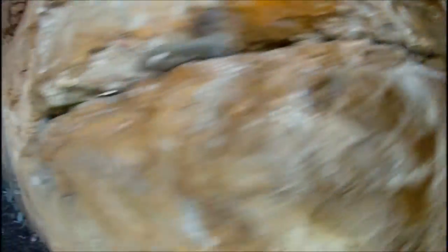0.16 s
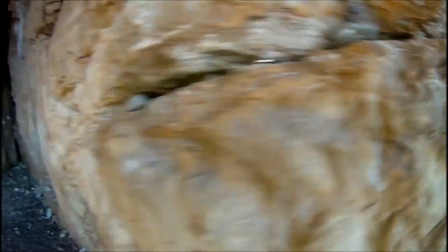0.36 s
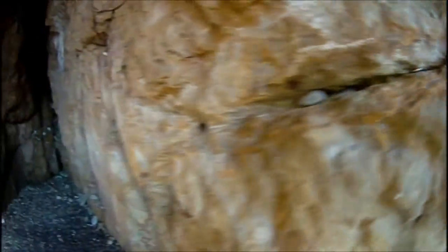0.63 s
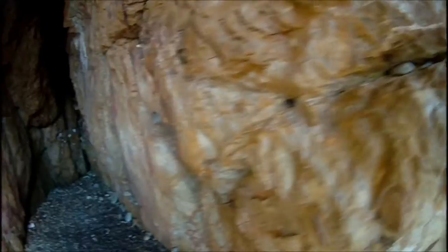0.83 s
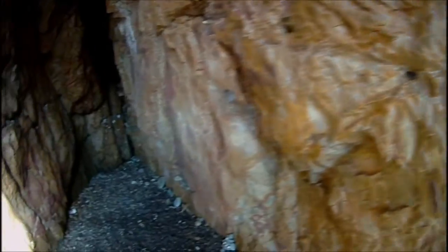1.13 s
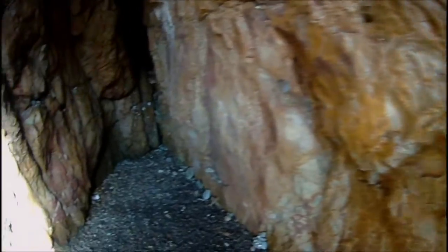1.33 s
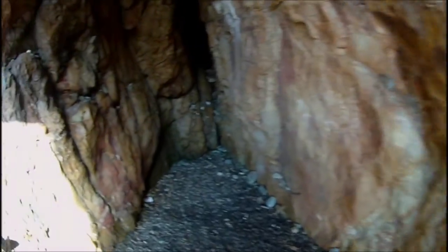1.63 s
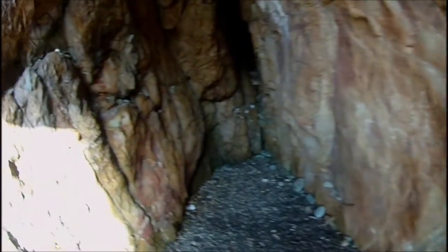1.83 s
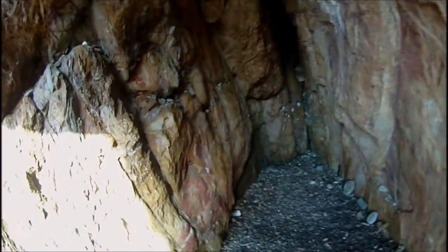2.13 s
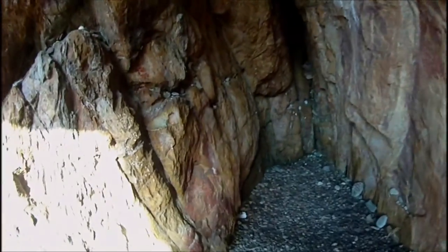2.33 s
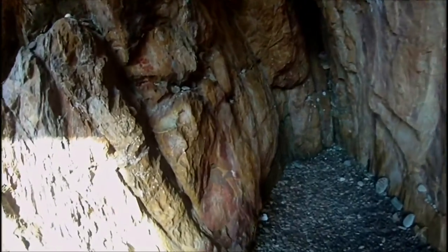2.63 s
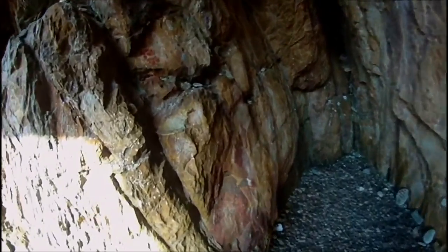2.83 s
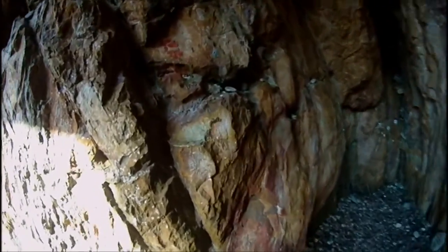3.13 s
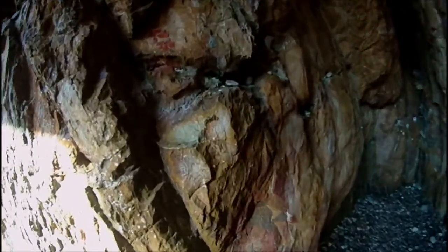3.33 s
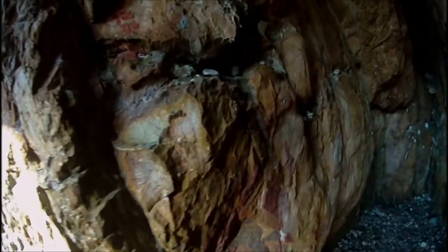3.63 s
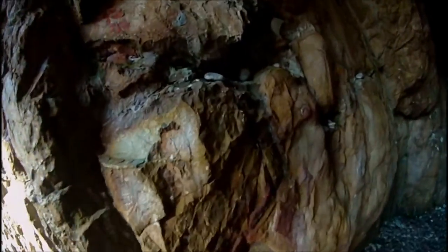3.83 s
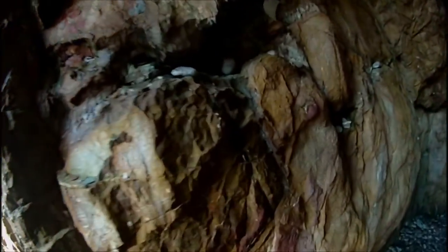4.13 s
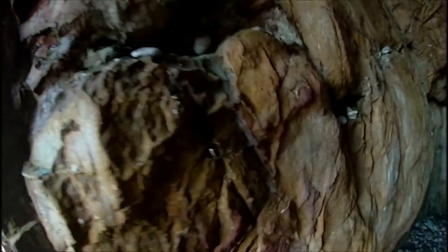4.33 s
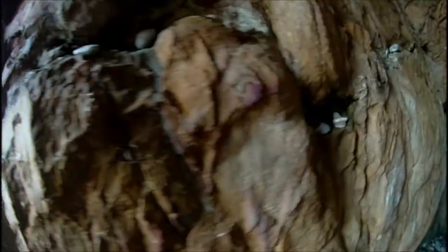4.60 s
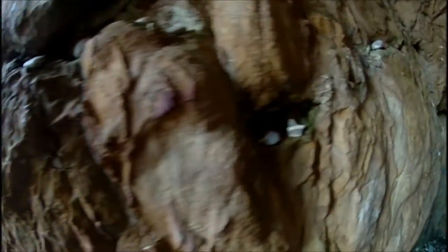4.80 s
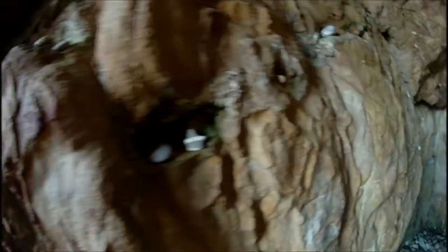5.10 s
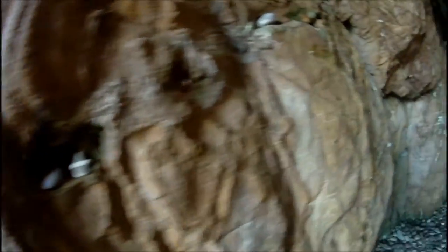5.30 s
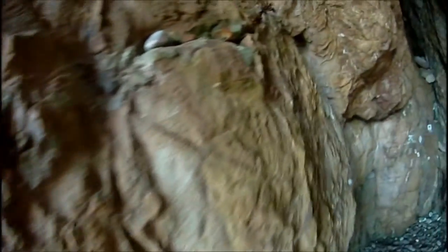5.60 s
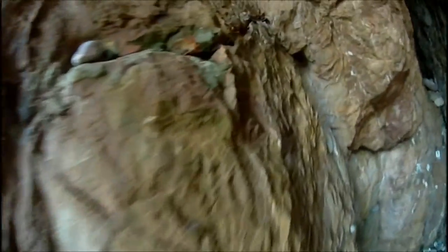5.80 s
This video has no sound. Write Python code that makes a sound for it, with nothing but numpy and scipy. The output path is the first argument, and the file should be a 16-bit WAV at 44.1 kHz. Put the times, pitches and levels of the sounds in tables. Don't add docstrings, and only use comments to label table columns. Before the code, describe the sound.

Someone walks unhurriedly on loose shingle inside a narrow sea cave, grit crushing and single stones knocking over distant wave wash.

```python
import sys
import numpy as np
from scipy import signal
from scipy.fft import rfft, irfft, next_fast_len
from scipy.io import wavfile
from scipy.ndimage import uniform_filter1d, map_coordinates

SR = 44100
rng = np.random.default_rng(int(sys.argv[2]) if len(sys.argv) > 2 else 0)


def decibels_to_gain(level_db):
    exponent = np.asarray(level_db, float) / 20
    return 10 ** exponent


def materialize(psi):
    bounded = np.clip(np.atleast_2d(psi).T, -1, 1)
    quanta = np.round(bounded * 32767).astype(np.int16)
    wavfile.write(sys.argv[1], SR, quanta)


N = 262561


def unit(x):
    return x / np.sqrt(np.mean(x ** 2) + 1e-20)


def along(points, hz):
    f, v = np.transpose(points)
    return np.interp(np.log(hz + 1), np.log(f + 1), v)


def wobble(rate):
    knots = rng.standard_normal(int(N * 40 / SR))
    return map_coordinates(knots, [np.arange(N) * min(rate, 39) / SR])


def filtered(x, response):
    m = next_fast_len(N + 8192, real=True)
    return irfft(rfft(x, m) * response(np.fft.rfftfreq(m, 1 / SR)), m)[..., :N]


def causal(points):
    def response(hz):
        c = irfft(np.log(decibels_to_gain(along(points, hz))))
        c[1:len(c) // 2] *= 2
        c[len(c) // 2 + 1:] = 0
        return np.exp(rfft(c))
    return response


def noise(spectrum, patchy_db, channels=1):
    z = signal.stft(rng.standard_normal((channels, N)), nperseg=512)[2]
    field = rng.standard_normal(z.shape[1:])
    field = uniform_filter1d(field, size=6, axis=0)
    field = uniform_filter1d(field, size=10, axis=1)
    x = signal.istft(z * decibels_to_gain(patchy_db * unit(field)), nperseg=512)[1][:, :N]
    return unit(filtered(x, lambda hz: decibels_to_gain(along(spectrum, hz))))


def swells(s, db, rise, fall, since=0):
    t = np.arange(0, N + 64, 64)[:, None] / SR
    below = np.maximum((s - t) / np.abs(rise), (t - s) / np.abs(fall))
    each = (t >= since) * decibels_to_gain(db - 20 * below)
    total = np.sqrt(np.sum(each ** 2, axis=1)) + 1e-9
    return np.interp(np.arange(N) / SR, t[:, 0], total)


def rings(start, gain, hz, cycles, size):
    k = np.arange(size)
    turn = k * hz[:, None] / SR
    wave = gain[:, None] * np.sin(2 * np.pi * turn) * np.exp(-turn / cycles) * np.tanh(1.75 * turn)
    return np.bincount((start[:, None] + k).ravel(), wave.ravel(), N + size)[:N]


# peak_s, grit_db, fall_20db_s, pebble_share_db, sand_share_db
HEEL_LANDINGS = [(0.642, -47, 0.3, -10, -14.5), (.793, -54, 0.5, -12, -27), (1.335, -45, 0.1, -14, -11),
                 (1.462, -60, 0.3, -3, -12.5), (1.641, -47, 0.28, -2, -15), (1.702, -44, .1, -2, -17),
                 (2.281, -48.5, 0.45, -15, -25), (3.041, -48.5, .1, -8, -6), (3.06, -38, 0.09, -3, -14.5),
                 (3.36, -58, 0.13, -14, -14), (3.672, -50.5, .3, 1, -25), (3.71, -39, .06, -10.5, -16),
                 (3.886, -51, .15, -7, -9), (4.486, -45, 0.13, -15, -21.5), (5.152, -44.5, 0.33, -3, -15),
                 (5.873, -49.5, .3, -6, -20), (5.917, -39, 2, -16, -19)]
LAND_S = 0.006


def touchdown(s):
    landed = np.array([row[0] for row in HEEL_LANDINGS]) - LAND_S
    return landed[np.maximum(np.searchsorted(landed, s) - 1, 0)]


# time_s, level_db
SEA_OPENNESS = [(0, 5.5), (.1, 3.5), (.55, 3.5), (.95, 1), (1.4, 3.5), (2.0, 0.5), (2.45, 0.5), (3.0, -1),
                (3.5, -0.5), (4.1, 0), (4.4, -1.5), (4.65, 0), (5.6, -1), (5.95, 1.5)]


def openness():
    s, db = np.transpose(SEA_OPENNESS)
    return np.interp(np.arange(N) / SR, s, db)


# pitch_hz, level_db (per Hz)
SURF_COLOUR = [(60, -56), (130, -24), (250, -9.5), (450, -3), (1000, -1.5), (2000, -1.5), (3500, -6),
               (6000, -11.5), (8000, -24), (12000, -25.5), (15000, -24)]


def surf(open_db):
    level_db = -59 + open_db + 0.5 + 0.82 * wobble(4.42)
    return decibels_to_gain(level_db) * noise(SURF_COLOUR, patchy_db=1.35)[0]


# pitch_hz, level_db (per Hz)
RUSTLE_COLOUR = [(2000, -27), (3500, -3.5), (5300, 0), (6300, -5), (7200, -14), (10000, -22), (15000, -50)]


def rustle(open_db):
    level_db = -61 + 1.22 * open_db - 2.0 + 0.88 * wobble(7.9)
    return decibels_to_gain(level_db) * noise(RUSTLE_COLOUR, patchy_db=2.0)[0]


# pitch_hz, level_db (per Hz)
WIND_COLOUR = [(5, -25), (15, 1.5), (35, -0.5), (70, -7), (120, -11.5), (300, -40)]
# peak_s, level_db, rise_or_fall_20db_s
WIND_GUSTS = [(0, -74, -0.4), (.27, -73, 0), (.52, -73.5, 0.4), (.68, -84, 4), (.77, -59.5, 0.04),
              (.84, -57.5, 0.05), (1.19, -80, 0.2), (1.36, -70, .15), (1.53, -74, .2), (1.62, -76, .15),
              (1.72, -70, -0.2), (1.83, -70, .1), (1.94, -73, 0.3), (2.15, -73.5, .12), (2.25, -73, 0.3),
              (2.44, -91, 3), (3.76, -75, 0.2), (5.2, -85, 1), (5.73, -79, .1), (5.88, -71.5, .08)]


def wind():
    s, db, width = np.transpose(WIND_GUSTS)
    breeze_db = -87.5
    gusts = np.hypot(decibels_to_gain(breeze_db), swells(s, db, width, width))
    return gusts * decibels_to_gain(6.0 + 1.6 * wobble(13)) * noise(WIND_COLOUR, patchy_db=2.0)[0]


# pitch_hz, level_db (per Hz)
JOLT_COLOUR = [(60, -43), (100, -3.5), (170, 2), (280, -1.5), (450, -33.5)]
# peak_s, sole_db, sole_fall_20db_s, jolt_db
FOOT_PUSHES = [(.68, -53, 0.1, -73), (.83, -71, .2, -77), (1.336, -45.5, 0.06, -68.5),
               (1.42, -56, -0.06, -77.5), (1.69, -52.5, .3, -69), (1.8, -57, 0.4, -65),
               (2.329, -53, 0.44, -66), (2.44, -64, -0.2, -63.5), (3.061, -47, .15, -74),
               (3.43, -77, -9, -77), (3.69, -51.5, .2, -82), (3.76, -52, 0.24, -68),
               (3.89, -57, 0.44, -66.5), (4.54, -52.5, 0.43, -63), (4.64, -78, -0.3, -66),
               (5.002, -60, 0.8, -69), (5.158, -53.5, 0.63, -62), (5.43, -57.5, .2, -65),
               (5.931, -47.5, 2, -73)]
PUSH_S = 0.063


def jolts():
    s, _, _, jolt_db = np.transpose(FOOT_PUSHES)
    sway_db, shake_s = -84, 0.2
    shakes = np.hypot(decibels_to_gain(sway_db), swells(s, jolt_db, PUSH_S, shake_s, since=touchdown(s)))
    return shakes * decibels_to_gain(1.8 * wobble(15)) * noise(JOLT_COLOUR, patchy_db=3.0)[0]


# start_s, length_s, pitch_hz, level_db, octave_share_db
STRAP_WHISTLES = [
    (1.534, 0.15, 4720, -57.5, -9),
    (2.836, 0.1, 4680, -61.5, -18),
]
# start_s, length_s, pitch_hz, level_db, octave_share_db
STRAP_RUBS = [
    (1.08, 0.11, 4750, -55, -25),
    (0.241, 0.16, 5150, -56.5, -15),
    (0.3, 0.24, 6100, -59, -33),
    (0.435, 0.0904, 4400, -62, -23),
    (1.164, 0.07, 5400, -55, -21.5),
    (1.27, 0.053, 5360, -54, -34),
    (1.833, 0.049, 5380, -56, -26),
    (2.008, 0.07, 4900, -65, -6),
    (2.09, 0.068, 4600, -63, -5),
]


def squeaks():
    out = np.zeros(N + SR)
    whistles = [(*row, 30) for row in STRAP_WHISTLES]
    rubs = [(*row, 350) for row in STRAP_RUBS]
    for s, length, hz, db, octave_db, blur_hz in whistles + rubs:
        n = round(length * SR)
        wander = uniform_filter1d(rng.standard_normal(SR // 4), size=12)[:n]
        phase = np.cumsum(2 * np.pi * hz / SR + np.sqrt(2 * np.pi * blur_hz / SR) * wander)
        swell = np.sin(np.pi * np.arange(n) / n)
        tone = np.sin(phase) + decibels_to_gain(octave_db) * np.sin(2 * phase)
        out[round(s * SR):][:n] += decibels_to_gain(db + 1.5) * swell * tone
    return out[:N]


# pitch_hz, fall_60db_s
CAVE_DECAY = [(200, 0.18), (2000, 0.13), (6000, 0.3), (12000, 0.12)]


def cave(x):
    out, parts = np.zeros(N + SR), 12
    edge = np.linspace(0, N, parts + 1).astype(int)
    for a, b in zip(edge, edge[1:]):
        hz, t, z = signal.stft(rng.standard_normal(SR // 2), SR, nperseg=256)
        fading = z * decibels_to_gain(-60 * t / along(CAVE_DECAY, hz)[:, None])
        tail = signal.istft(fading, SR, nperseg=256)[1][:SR // 2]
        wet = signal.fftconvolve(x[a:b], tail / np.linalg.norm(tail))
        out[a + 130:][:len(wet)] += wet
    return out[:N]


# start_s, peak_db, ring_hz, snap_share_db
STONE_CLACKS = [(0.6643, -29.5, 5990, -17), (0.6892, -27, 4370, -25), (0.792, -35, 5900, -28),
                (1.3303, -30, 5440, -19), (1.3443, -27.5, 5200, -21), (1.6353, -34, 4670, -27),
                (1.7046, -33, 4900, -19), (1.7167, -27, 5670, -20), (2.4596, -29, 5900, -21),
                (3.038, -38, 5750, -7), (3.0568, -21, 6260, -22), (3.703, -27, 3500, -32),
                (3.713, -24, 3530, -22), (3.7264, -21, 5220, -26), (3.7363, -17, 5000, -31),
                (3.7862, -26, 4900, -29), (4.4872, -35, 5000, -35), (4.497, -34, 5550, -29),
                (4.555, -30.5, 5900, -26), (5.1531, -26.5, 6100, -12), (5.1665, -24.5, 4460, -20),
                (5.1946, -15.5, 5830, -12), (5.209, -21, 5960, -21), (5.2225, -16, 6070, -27),
                (5.232, -27, 5600, -26), (5.3998, -31.5, 3190, -30), (5.879, -35.5, 3440, -21),
                (5.914, -33, 5400, -22)]
# start_s, peak_db, ring_hz
STONE_TICKS = [(0.6378, -45.5, 5180), (1.46, -38.5, 5600), (2.2786, -51, 5070), (2.413, -35, 3860),
               (3.141, -42, 6000), (3.667, -44.5, 5200), (4.479, -39.5, 4600), (4.482, -43.5, 5100),
               (4.575, -38, 5840), (4.6802, -42, 5640), (4.7294, -36.5, 5290), (5.3667, -40, 5280),
               (5.8714, -44, 3610)]
# start_s, peak_db, ring_hz, thump_db
STONE_KNOCKS = [
    (2.3095, -38.5, 5200, -37),
    (3.8825, -35, 6480, -42),
    (4.5994, -32.5, 6300, -40),
    (4.992, -57, 5000, -47),
    (5.142, -50, 5000, -46),
    (5.9216, -27.5, 5910, -46),
    (5.931, -28, 5730, -30),
]


def stones():
    snap_db, thump_db = -24, -64
    clack_rows = [(*row, thump_db) for row in STONE_CLACKS]
    tick_rows = [(*row, snap_db, thump_db) for row in STONE_TICKS]
    knock_rows = [(s, db, hz, snap_db, own_thump_db) for s, db, hz, own_thump_db in STONE_KNOCKS]
    return np.transpose(clack_rows + tick_rows + knock_rows)


def clacks():
    s, db, hz, snap_db, thump_db = stones()
    start = ((s + 0.001374) * SR).astype(int)
    ring = rings(start, decibels_to_gain(db + 1), hz, cycles=2.4, size=192)
    overtone = rings(start, decibels_to_gain(db + snap_db + 13), hz * 1.55, cycles=3.8, size=256)
    tick = rings(start, decibels_to_gain(db - 6.5), np.full_like(hz, 3000), cycles=1.55, size=64)
    thump = rings(start, decibels_to_gain(thump_db - 1.5), np.full_like(hz, 720), cycles=2.7, size=640)
    snap = rings(start, decibels_to_gain(db + snap_db + 14), np.full_like(hz, 10500), cycles=1.6, size=32)
    hum = rings(start, decibels_to_gain(db - 16.5), hz, cycles=22, size=1024)
    return ring + hum + overtone + tick + snap + thump


def grains(count, hz, spread, cycles, scatter_db, size):
    when, large = rng.random((count, 2)).T
    pitch = np.clip(hz * np.exp(spread * rng.standard_normal(count)), 100, SR * .4)
    gain = decibels_to_gain(-scatter_db * np.log(1 - .995 * large))
    return unit(rings((when * N).astype(int), gain, pitch, cycles, size))


def spilled_grit():
    s, db, *_ = stones()
    kicks = np.bincount((s * SR).astype(int), decibels_to_gain(db - 19.5), N)
    return signal.lfilter([1], [1, -np.exp(-1 / (0.012 * SR))], kicks)


# pitch_hz, level_db (per Hz)
SOLE_COLOUR = [(150, -23), (330, -2), (500, -2), (1000, -0.5), (1600, -3.5), (3000, -42)]


def sole_push(slip):
    s, sole_db, fall, _ = np.transpose(FOOT_PUSHES)
    push = swells(s, sole_db, PUSH_S, fall, since=touchdown(s))
    return decibels_to_gain(3.0) * slip * push * noise(SOLE_COLOUR, patchy_db=0.7)[0]


# peak_s, grit_db, rise_20db_s, pebble_share_db, sand_share_db
WEIGHT_ROLLS = [(0.698, -39.5, -0.03, -9.5, -20), (0.826, -46, .12, -16, -29), (.875, -51.5, .1, -20, -29),
                (1.35, -45.5, -1, -18, -10.5), (1.724, -38, .04, -2, -9.5), (1.85, -55, 7, -9, -14.5),
                (2.325, -43, 5, -10, -26), (2.478, -43, 0.5, -7.5, -14), (3.075, -37, -0.5, -11, -22),
                (3.14, -46.5, 0, -8, -29), (3.24, -54.5, 0.6, -22, -15.5), (3.757, -26, 0.12, -11.5, -23),
                (3.916, -47, .1, -6.5, -11), (4.52, -50, -1, -3, -19), (4.625, -46, 0.3, -3.5, -17),
                (4.751, -50, 1, -6, -17.5), (5.21, -33.5, 0.13, -9.5, -11.5), (5.234, -32.5, 0.2, -17, -27),
                (5.422, -42.5, .07, -4, -19), (5.46, -50.5, 3, -5, -24), (5.931, -38, 4, -3, -19)]


def footfalls():
    lift_s = 0.074
    rows = [(s, db, LAND_S, fall, *mix) for s, db, fall, *mix in HEEL_LANDINGS]
    rows += [(s, db, rise, lift_s, *mix) for s, db, rise, *mix in WEIGHT_ROLLS]
    s, db, rise, fall, pebble_db, sand_db = np.transpose(rows)
    landed = touchdown(s)
    press = swells(s, db, rise, fall, landed)
    coarse = swells(s, db + pebble_db, rise, fall, landed)
    fine = swells(s, db + sand_db, rise, fall, landed)
    slip = decibels_to_gain(1.2 * wobble(35))
    load = np.hypot(decibels_to_gain(-4.5) * press * slip, spilled_grit())
    grit = grains(count=17000, hz=5640, spread=0.15, cycles=2.7, scatter_db=0.5, size=64)
    pebbles = grains(count=8000, hz=3174, spread=0.34, cycles=1.9, scatter_db=1.5, size=88)
    sand = grains(count=24000, hz=8800, spread=0.23, cycles=2.9, scatter_db=2.0, size=24)
    pebbles = decibels_to_gain(2.5) * coarse / press * pebbles
    sand = decibels_to_gain(16) * fine / press * sand
    return load * (grit + pebbles + sand) + sole_push(slip)


# pitch_hz, gain_db
PORT_GAIN = [(100, -5.5), (1500, -6.5), (3500, 1.5), (5300, 0.5), (6300, -1), (8000, -7.5), (15000, -16.5)]


def scene():
    open_db = openness()
    background = surf(open_db) + rustle(open_db) + wind() + jolts()
    near = footfalls() + clacks()
    steps = filtered(near + decibels_to_gain(-9.5) * cave(near), causal(PORT_GAIN))
    heard = steps + squeaks() + background
    return np.array([heard, heard])


def band_limit(x):
    return signal.sosfilt(signal.butter(12, 15470, fs=SR, output="sos"), x)


# pitch_hz, level_db (per Hz)
HISS_COLOUR = [(3000, -20), (7000, -10), (11000, -8), (15000, -10.5)]


def record(dry):
    corner_hz, top_hz = 150, 15300
    right = filtered(dry[1], lambda hz: 1j * hz / (corner_hz + 1j * hz))
    hiss = decibels_to_gain(-74.0) * noise(HISS_COLOUR, patchy_db=4.0, channels=2)
    mix = filtered(np.array([dry[0], right]) + hiss, lambda hz: hz < top_hz)
    mix = mix - [[.002124], [0]]
    return band_limit(mix)


dry = scene()
out = record(dry)
materialize(out)
```